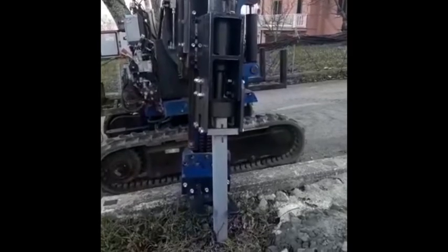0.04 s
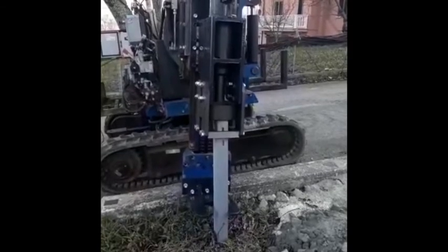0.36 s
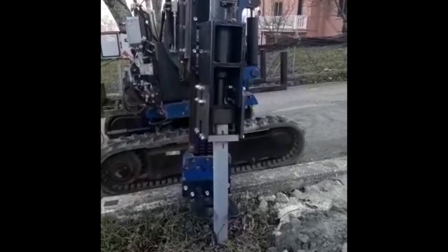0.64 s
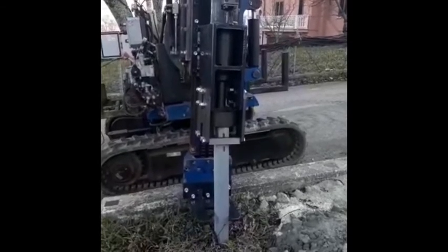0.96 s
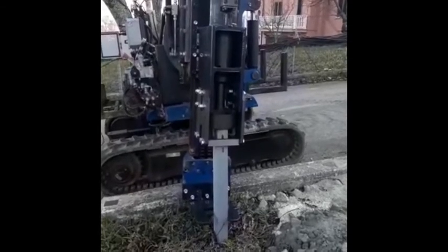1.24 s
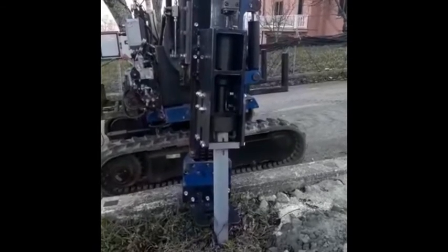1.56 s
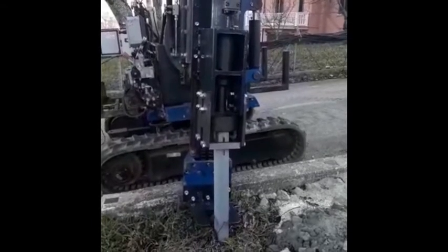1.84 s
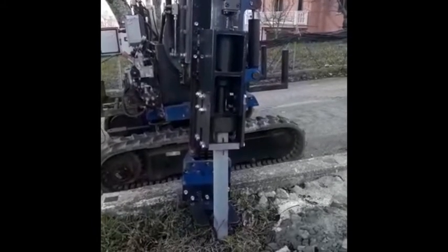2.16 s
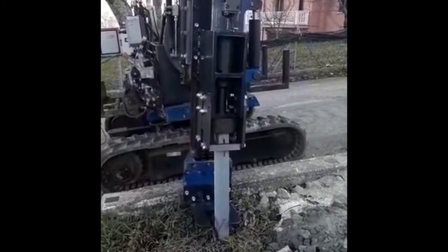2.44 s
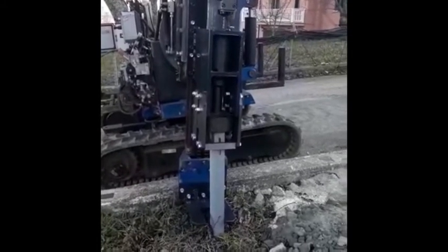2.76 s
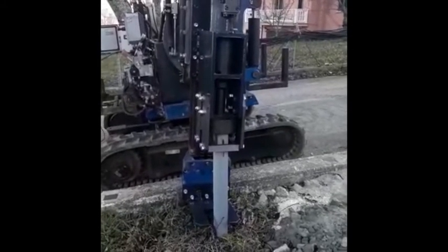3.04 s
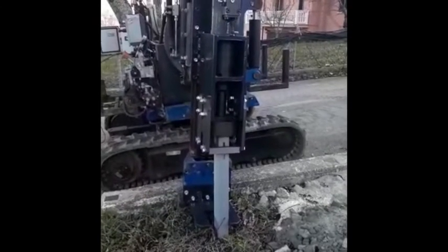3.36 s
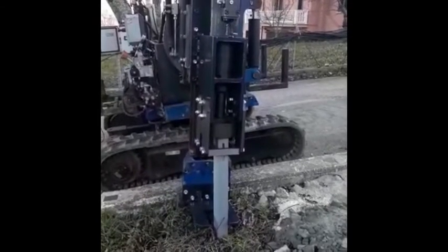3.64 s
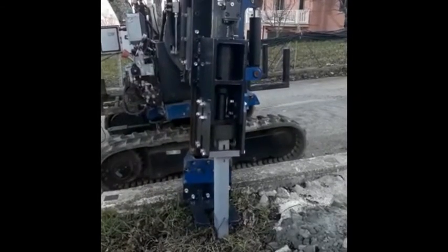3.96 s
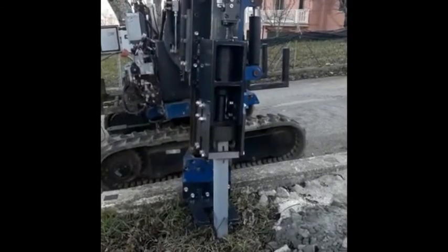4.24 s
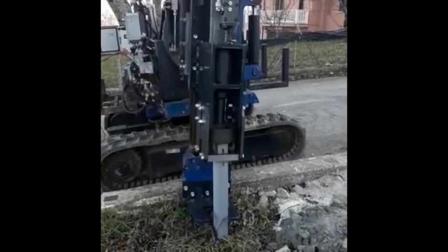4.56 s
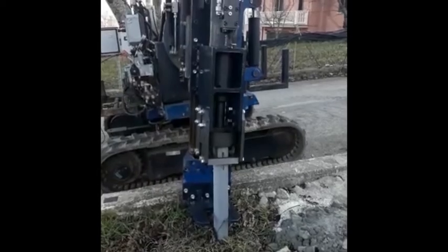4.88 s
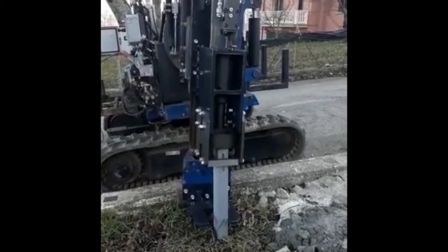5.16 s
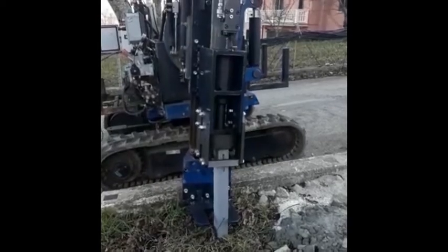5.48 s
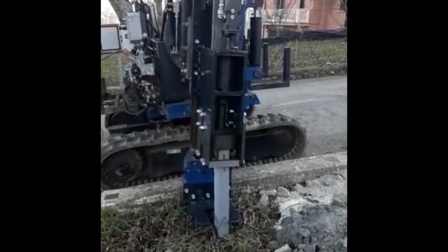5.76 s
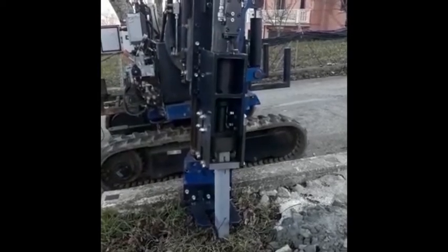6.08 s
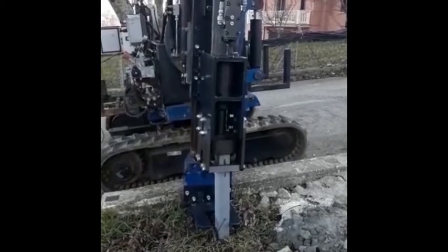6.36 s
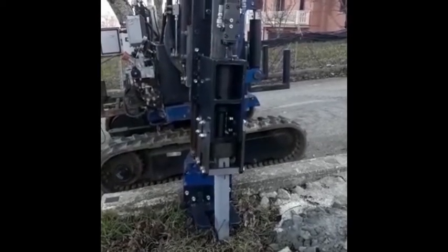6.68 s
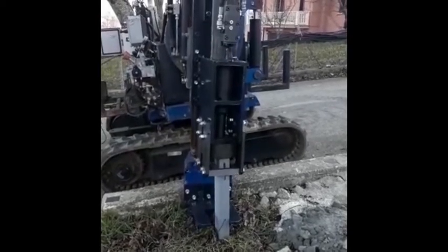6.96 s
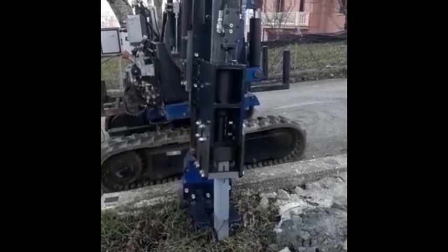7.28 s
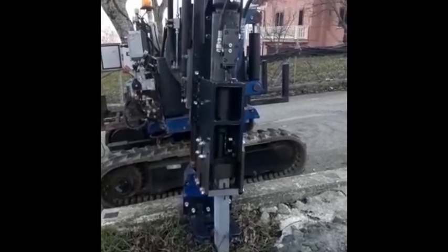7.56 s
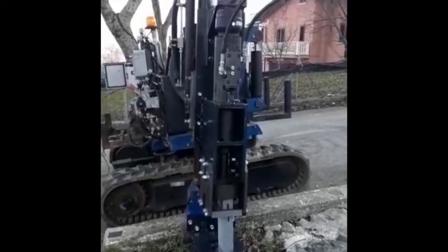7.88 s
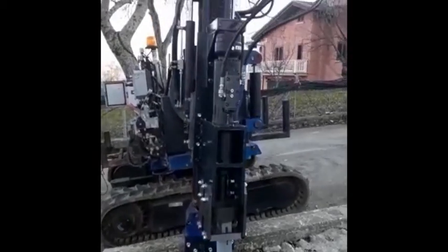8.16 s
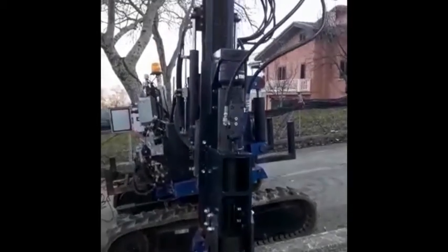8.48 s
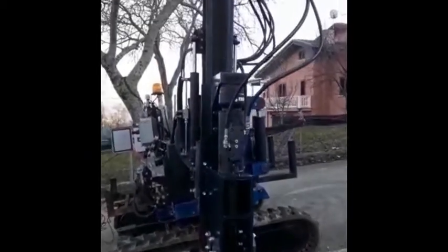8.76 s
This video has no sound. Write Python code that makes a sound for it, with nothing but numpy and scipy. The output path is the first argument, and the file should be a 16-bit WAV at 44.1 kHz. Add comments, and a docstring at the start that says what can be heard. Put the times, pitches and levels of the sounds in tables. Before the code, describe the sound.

Rapid, evenly spaced steel blows sound close by throughout as a tracked rig hammers a post into a road verge. Each hit crashes and leaves a thin, bright ring with a short outdoor wash. The post sings out more in two stretches, and the cap sometimes drops back with a second clank. A quieter diesel drone and faint oil whistle run beneath, the engine slowing at the end.

```python
"""A roadside verge: a hydraulic hammer on a tracked rig drives a steel post, about six blows a second.
Each blow is a valve tick, a dense steel crash that holds its level briefly and dies away, and a high
ring that lasts until the cap seats again. Twice the cap works loose and the post sings; now and then
the cap drops back with a second clank. Underneath, oil whistles faintly and the diesel drones, sagging
towards the end."""
import sys
import numpy as np
from scipy import signal
from scipy.io import wavfile

SR = 44100
rng = np.random.default_rng(int(sys.argv[2]) if len(sys.argv) > 2 else 0)


def wav_record(signal):
    """Record a signal, one row per channel, as 16-bit PCM in the file named by sys.argv[1]."""
    frames = np.transpose(np.atleast_2d(signal))
    bounded = np.clip(frames, -1, 1)
    # unit amplitude maps onto the largest positive 16-bit level
    quanta = np.round(bounded * 32767).astype(np.int16)
    wavfile.write(sys.argv[1], SR, quanta)


N = 393372
TIME = np.arange(N) / SR
SIDES = np.array([[.5], [-.5]])  # splits a left-right difference between the channels

# how alike the two channels are: (frequency [Hz], correlation [0-1])
STEREO_LIKENESS = [(30, .42), (60, .3), (130, .14), (290, .24), (640, .3), (1410, .04), (3100, .02),
                   (7000, 0)]
# the diesel's speed and load: (time [s], firing rate [Hz], exhaust boom level [dB])
ENGINE_RUN = [(0, 65.9, -39.5), (.6, 65.7, -50), (3.4, 66, -48), (4.7, 65.5, -42.5), (5.2, 65.75, -49.5),
              (6.3, 65.66, -48.5), (7.4, 64.8, -41.5), (8.1, 64.6, -43.5), (8.45, 60.6, -41),
              (8.649, 61.5, -49), (8.8, 51.2, -47), (8.92, 51, -48)]
# the diesel's other harmonics: (multiple of the firing rate, level [dB])
ENGINE_HARMONICS = [(1, -49), (3, -51.5), (4, -55.5), (5, -53.5), (6, -52.5)]
# colour of the engine and pump noise: (frequency [Hz], relative density [dB])
DRONE_SPECTRUM = [(25, -9), (60, -14), (90, -1), (130, -12), (250, -7), (600, -2), (1500, 0), (3000, -4.5),
                  (4500, -28), (6500, -12), (10000, -14), (15000, -19)]
# colour of the valve tick: (frequency [Hz], relative density [dB])
TICK_SPECTRUM = [(100, 1), (500, 11), (1800, 9.5), (4000, 4.5), (7000, 2), (10500, 8.5), (15000, -14)]
# the ram lands: (time [s], relative crash level [dB])
BLOWS = [(0.0131, -13), (0.186, -13), (0.3594, -12.5), (0.5289, -12.5), (0.699, -12), (0.869, -14.5),
         (1.0381, -14), (1.2048, -13), (1.3739, -13), (1.5413, -12.5), (1.7078, -12.5), (1.874, -13),
         (2.0381, -12), (2.2037, -12.5), (2.372, -13), (2.541, -13), (2.7107, -12.5), (2.8832, -14),
         (3.0571, -14), (3.23, -14.5), (3.403, -15), (3.5822, -16), (3.7556, -12.5), (3.9204, -12.5),
         (4.0883, -13.5), (4.2563, -13), (4.4261, -13.5), (4.5975, -11.5), (4.7675, -12), (4.9368, -13),
         (5.104, -12), (5.2721, -12.5), (5.4389, -14), (5.599, -12.5), (5.765, -13.4), (5.9276, -15),
         (6.092, -15), (6.2572, -15), (6.4276, -14), (6.6034, -13.5), (6.771, -13.5), (6.9373, -11.5),
         (7.1063, -12), (7.277, -13), (7.4477, -13), (7.6203, -11.5), (7.7938, -12.5), (7.9674, -12),
         (8.1411, -12), (8.3172, -11.5), (8.4989, -11.5), (8.6938, -12), (8.918, -10)]
# how the cap sits on the post: (time [s], looseness [0 tight to 1 bouncing clear])
CAP_LOOSENESS = [(0, 0.093), (1.7, 0.049), (2.2, 0.34), (2.37, 0.39), (2.71, 0.52), (2.88, 0.68),
                 (3.06, 0.91), (3.4, 0.93), (3.58, 0.61), (3.76, 0.34), (4.6, .2), (5.44, 0.19),
                 (5.93, 0.51), (6.09, 0.54), (6.26, 0.79), (6.43, 0.64), (6.6, 0.3), (8.7, 0.16)]
# how long the crash holds, and how a looser cap frees the post to ring longer and louder:
# (looseness [0-1], crash hold [s], free ring [s], low ring [dB], middle ring [dB], high ring [dB])
SEATING = [(0, 0.014, 0.015, -42, -42, -22), (0.243, 0.021, 0.014, -23, -29, -20.5),
           (0.515, 0.028, 0.069, -23.5, -27, -16.5), (.75, 0.073, 0.082, -14, -20.5, -19.5),
           (0.994, 0.028, 0.193, -22, -16, -19)]
# pitches of the cap's high modes: (frequency [Hz])
CAP_HZ = [7660, 7790, 9572, 10237, 10485, 11516, 11649, 13210, 13992, 14166, 14925, 15725]
# how each of them rings: (level against the crash [dB], t60 before the cap seats [s])
CAP_MODES = [(-9.5, 0.1), (-12, 0.13), (-17, 0.086), (-13, 0.45), (-27, 0.1), (-17, 0.26), (-27, 0.27),
             (-17, 0.12), (-15.5, 0.32), (-14.5, 0.28), (-27, .17), (-21, 0.49)]
# spells when one cap mode sings on: (start [s], end [s], near frequency [Hz], level [dB], t60 [s])
ZING_SPELLS = [(0, .95, 14166, -22.5, 0.63), (3.85, 4.35, 11570, -24.5, 1.4), (4.5, 5.7, 11470, -31.5, 0.6),
               (4.85, 5.02, 14300, -16.5, 0.28), (6.01, 6.18, 10500, -7, 0.31),
               (6.85, 7.03, 11516, -24, 0.76), (7.37, 8.06, 14100, -17, 0.18),
               (8.4, 8.8, 11400, -34.5, 0.48)]
# the cap drops back on the post: (time [s], relative level [dB])
CAP_DROPS = [(2.955, -30), (3.496, -22), (4.484, -13.5), (6.825, -20), (7.163, -15), (7.33, -24.5),
             (7.498, -24), (7.671, -14), (7.717, -19.5)]
# resonances of the dropping cap: (frequency [Hz], width [Hz], gain [dB])
CLANK_MODES = [(1086, 37, -15), (1558, 18, -15), (1635, 40, -6), (2116, 78, -2), (2410, 30, -8.5),
               (2670, 30, -6), (3100, 34, -12), (3240, 75, -16)]
# pitches of the post's modes: (frequency [Hz])
POST_HZ = [4488, 5930, 6717, 7731, 9558, 10237, 11229, 13210, 13992, 14925, 15455]
# how each of them rings: (gain [dB], free t60 [s], left over right [dB], left phase lead [rad])
POST_MODES = [(-5, 0.58, -0.5, -2), (-11, 0.24, 6, 1.5), (-6.5, 2.7, 0.5, 1.03), (-5, 1.2, -1, 2),
              (-3.5, 1.05, 11, -1.9), (-14, 0.66, 11, 0), (-10, 1.7, -1, 1.8), (-12.5, 1.2, 6, -1.5),
              (-16, 1.5, 0, -1), (-10.5, 1, -10, 3.5), (-29, 0.37, 0, 17)]
# resonances of the hammer housing and cap: (frequency [Hz], width [Hz], gain [dB])
HOUSING_MODES = [(256, 15.5, -24.5), (363, 16.5, -18.5), (565, 39, -17.5), (640.3, 12.4, -16),
                 (788, 30, -17.5), (957, 98, -23), (1075, 23, -21), (1203, 26, -15.5), (1296, 11.5, -23),
                 (1466, 90, -20.5), (1541, 37, -15.5), (1649, 71, -15.5), (1804, 26, -17.5),
                 (2010, 21, -24.5), (2187, 105, -17), (2570, 9.7, -33), (3197, 56, -18.5), (4475, 420, -14),
                 (9650, 150, -10), (10470, 170, -32)]
# colour of the crash's dense steel modes: (frequency [Hz], relative density [dB])
CRASH_SPECTRUM = [(40, -21), (80, -4), (160, 2), (320, 1.5), (800, -0.5), (1600, 2), (2600, -2),
                  (4300, -3.5), (6000, -15), (8400, -5.5), (9900, -9), (12300, -20), (15500, -10)]
# how fast the crash dies: (frequency [Hz], t60 [s])
CRASH_T60 = [(80, 0.078), (250, 0.15), (800, 0.23), (2000, 0.2), (6000, 0.045), (10000, 0.21),
             (15000, 0.059)]
# wash thrown back by rig, road and houses: (frequency [Hz], level against the crash [dB])
WASH_LEVELS = [(100, -62), (600, -3.5), (1500, -7.5), (4000, -13.5), (7000, -19.5), (15000, -34)]


def from_db(db):
    """Decibels to gain."""
    return 10 ** (np.asarray(db) / 20)


def unit_rms(x):
    """Scale to an rms of 1."""
    return x / np.sqrt(np.mean(x ** 2) + 1e-20)


def at_hz(points, hz):
    """Read a table on a log-frequency axis."""
    frequencies, values = np.transpose(points)
    return np.interp(np.log(hz), np.log(frequencies), values)


def attack(age, rise_s):
    """An onset that eases from 0 up to 1."""
    return 1 - np.exp(-age / rise_s)


def fade(age, t60):
    """Hold at 1 until age zero, then decay exponentially."""
    return np.exp(-np.log(1000) * np.maximum(age, 0) / max(t60, .005))


def since(times):
    """For every sample: the latest event's index and its age in seconds (10 before the first)."""
    latest = np.searchsorted(times, TIME, side="right") - 1
    return np.maximum(latest, 0), np.where(latest < 0, 10, TIME - times[latest])


def drift(rate):
    """A smooth random modulator with rms 1 that moves about `rate` times a second."""
    hop, warm_up = 40, 2000
    pole = np.exp(-2 * np.pi * rate * hop / SR)
    white = rng.standard_normal(N // hop + warm_up + 2)
    slow = signal.lfilter([1], [1, -2 * pole, pole * pole], white)[warm_up:]
    return np.interp(np.arange(N) / hop, np.arange(len(slow)), unit_rms(slow))


def widen(pair, hz):
    """Two unrelated signals become mid and side of a stereo image, narrower in the bass."""
    alike = at_hz(STEREO_LIKENESS, hz)
    mid, side = np.sqrt((1 + alike) / 2) * pair[0], np.sqrt((1 - alike) / 2) * pair[1]
    return np.array([mid + side, mid - side])


def bands(white, spectrum):
    """Half-octave stereo bands (centre, signal) that add up to the given colour with rms about 1."""
    edges = np.geomspace(24, 17000, 20)
    centres = np.sqrt(edges[1:] * edges[:-1])
    gains = from_db(at_hz(spectrum, centres)) * np.sqrt(np.diff(edges))
    for k, hz in enumerate(centres):
        bandpass = signal.butter(2, edges[k:k + 2], "band", fs=SR, output="sos")
        band = signal.sosfilt(bandpass, white[k % 2])  # neighbouring bands get unrelated noise
        yield hz, gains[k] / np.linalg.norm(gains) * unit_rms(widen(band, hz))


def coloured(spectrum):
    """A steady bed of stereo noise in the given colour."""
    return sum(band for _, band in bands(rng.standard_normal((2, 2, N)), spectrum))


def resonate(x, hz, width):
    """A resonance that keeps the rms of white noise."""
    pole = np.exp(-np.pi * width / SR)
    gain = np.sqrt((1 - pole * pole) / 2)
    return signal.lfilter([gain, 0, -gain], [1, -2 * pole * np.cos(2 * np.pi * hz / SR), pole * pole], x)


def oil_whistle(level_db=-51, hz=4540, width_hz=220):
    """Oil whistles faintly through a valve all the time."""
    return from_db(level_db) * resonate(rng.standard_normal((2, N)), hz, width_hz)


def diesel(throb=0.4, waver=0.0038, flutter_db=3.0, drone_db=-39.0, follows_load=0.62, db_per_octave=22):
    """Firing harmonics, an exhaust boom on the second, and pump noise that throbs with the firing."""
    times, *columns = np.transpose(ENGINE_RUN)
    firing_hz, boom_db = [np.interp(TIME, times, column) for column in columns]
    phase = 2 * np.pi * np.cumsum(firing_hz * (1 + waver * drift(5.4))) / SR
    hum = 0
    for multiple, db in list(ENGINE_HARMONICS) + [(2, boom_db)]:
        gain = np.sqrt(2) * from_db(db + flutter_db * drift(6.0))
        hum += gain * np.sin(multiple * phase + 2 * np.pi * rng.random())
    # the noise swells with load and speed
    load_db = follows_load * (boom_db - boom_db.mean())
    speed_db = db_per_octave * np.log2(firing_hz / firing_hz.mean())
    drone = from_db(drone_db + load_db + speed_db) * coloured(DRONE_SPECTRUM)
    return hum + (1 + throb * np.cos(phase)) * drone


def valve_ticks(lead_s=0.0082, hold_s=0.0047, t60=0.028, level_db=-24.5, scatter_db=2.0,
                ceiling_db=-25, scrape_s=0.0083, scrape_db=-3.0):
    """The valve ticks just before the ram lands; on its louder strokes a scrape swells into the blow."""
    start = np.transpose(BLOWS)[0]
    blow, age = since(start - lead_s)
    strength = from_db(level_db + scatter_db * rng.standard_normal(len(start)))[blow]
    tick = np.minimum(strength, from_db(ceiling_db))
    scrape = from_db(scrape_db) * (strength - tick) * np.exp(-abs(age - lead_s) / scrape_s)
    return (tick * fade(age - hold_s, t60) + scrape) * coloured(TICK_SPECTRUM)


def strokes():
    """For each blow: time, crash level, looseness, then the SEATING values for that looseness."""
    start, crash_db = np.transpose(BLOWS)
    loose = np.interp(start, *np.transpose(CAP_LOOSENESS))
    steps, *columns = np.transpose(SEATING)
    return [start, crash_db, loose] + [np.interp(loose, steps, column) for column in columns]


def cap_zings(rise_s=0.0084, spread_rad=1.0, scatter_db=2.5):
    """In short spells, a single mode of the cap rings on thinly into the gap after each blow."""
    start = np.transpose(BLOWS)[0]
    out = np.zeros((2, N))
    for begin, end, near_hz, db, t60 in ZING_SPELLS:
        hz = min(CAP_HZ, key=lambda mode_hz: abs(mode_hz - near_hz))
        for blow_s in start[(start >= begin) & (start <= end)]:
            at = int(blow_s * SR)
            age = TIME[:min(SR, N - at)]
            phase = 2 * np.pi * (hz * age + rng.random()) + spread_rad * rng.standard_normal((2, 1))
            gain = from_db(db + scatter_db * rng.standard_normal())
            out[:, at:at + len(age)] += gain * attack(age, rise_s) * fade(age, t60) * np.sin(phase)
    return out


def drop_envelope(trim_db, rise_s, t60):
    """A sharp swell and decay each time the cap drops back on the post."""
    start, db = np.transpose(CAP_DROPS)
    drop, age = since(start)
    return from_db(db[drop] + trim_db) * attack(age, rise_s) * fade(age, t60)


def cap_clanks():
    """The falling cap rattles briefly and rings in its own midrange modes."""
    rattle = drop_envelope(trim_db=0.5, rise_s=0.0012, t60=0.14) * rng.standard_normal((2, N))
    return sum(from_db(db) * widen(resonate(rattle, hz, width), hz) for hz, width, db in CLANK_MODES)


def cap_ring(rise_s=0.00048, scatter_db=3.0, buzz_rad=1.95, flutter_db=4.0, settle_t60=0.73,
             seat_s=0.055, seated_t60=0.46):
    """The cap meets the ram a little differently each time, so every blow favours other modes."""
    start, crash_db, _, hold_s = strokes()[:4]
    blow, age = since(start)
    envelope = attack(age, rise_s) * fade(age - seat_s, seated_t60)  # seating damps the cap
    roughness = fade(age - hold_s[blow], settle_t60)
    out = 0
    for hz, (db, t60) in zip(CAP_HZ, CAP_MODES):
        chance = rng.standard_normal((len(start), 3))[blow].T  # level, left phase, right phase
        ring_db = crash_db[blow] + db + scatter_db * chance[0] + flutter_db * roughness * drift(90)
        phase = 2 * np.pi * (hz * TIME + chance[1:]) + buzz_rad * roughness * drift(80)
        out += from_db(ring_db) * envelope * fade(age - hold_s[blow], t60) * np.sin(phase)
    return out


def post_ring(trim_db=4.0, seated_t60=0.14, lingers_below_hz=4700, rise_s=0.0047, scatter_db=1.0,
              flutter_db=3.5, buzz_rad=0.82, settle_t60=0.51, spread_rad=0.55):
    """The post rings freely while the cap is off it and is damped when the cap seats."""
    start, _, _, hold_s, free_s, *register_db = strokes()
    blow, age = since(start)
    roughness = fade(age - hold_s[blow], settle_t60)  # rough while the crash holds, then purer
    out = 0
    for hz, (db, free_t60, pan_db, lead_rad) in zip(POST_HZ, POST_MODES):
        damped_t60 = seated_t60 * (1 + (lingers_below_hz / hz) ** 4)  # high modes choke soonest
        envelope = attack(age, rise_s) * fade(age, free_t60) * fade(age - free_s[blow], damped_t60)
        drive_db = register_db[np.searchsorted([5500, 9000], hz)][blow]  # low, middle or high ring
        chance = rng.standard_normal((len(start), 3))[blow].T  # level, phase, stereo spread
        ring_db = drive_db + db + trim_db + scatter_db * chance[0] + flutter_db * roughness * drift(52)
        phase = 2 * np.pi * (hz * TIME + chance[1]) + buzz_rad * roughness * drift(45)
        stereo_phase = (lead_rad + spread_rad * chance[2]) * SIDES
        pan = unit_rms(from_db(pan_db * SIDES))
        out += np.sqrt(2) * from_db(ring_db) * envelope * pan * np.sin(phase + stereo_phase)
    return out


def housing_ring(drive, blow, scatter_db=3.0):
    """The body of the crash: housing and cap resonate, and each blow favours other resonances."""
    burst = drive * rng.standard_normal((2, N))
    out = 0
    for hz, width, db in HOUSING_MODES:
        favour = from_db(db + scatter_db * rng.standard_normal(len(BLOWS)))[blow]
        out += widen(resonate(favour * burst, hz, width), hz)
    return out


def steel_crash(trim_db=1.4, repeat_share=0.3, rise_s=0.0014, rough_db=1.87, crack_db=9.5,
                crack_s=0.0077, treble_hold=0.36, wash_t60=0.41, wash_stretch=0.58, housing_t60=0.17):
    """A dense steel crash holds its level briefly, then dies away."""
    start, crash_db, loose, hold_s = strokes()[:4]
    blow, age = since(start)
    force = from_db(crash_db[blow] + trim_db) * attack(age, rise_s)
    flicker = from_db(rough_db * drift(49))
    drop = drop_envelope(trim_db=-5.0, rise_s=rise_s, t60=0.22)  # the falling cap wakes the same modes
    # the same steel is struck each time, so part of the vibration repeats from blow to blow
    repeated = rng.standard_normal((2, 2, SR))[..., (age * SR).astype(int) % SR]
    fresh = rng.standard_normal((2, 2, N))
    white = np.sqrt(repeat_share) * repeated + np.sqrt(1 - repeat_share) * fresh
    wash_tail = fade(age / (1 + wash_stretch * loose[blow] ** 2), wash_t60)  # longer with a loose cap
    # the treble peaks early and lets go sooner
    crack = from_db(crack_db * np.exp(-age / crack_s)) - 1
    steel = 0
    for hz, band in bands(white, CRASH_SPECTRUM):
        treble = hz / (hz + 3000)
        band_hold_s = hold_s[blow] * (1 + treble * (treble_hold - 1))
        hit = force * flicker * (1 + treble * crack) * fade(age - band_hold_s, at_hz(CRASH_T60, hz))
        wash = force * from_db(at_hz(WASH_LEVELS, hz)) * wash_tail
        clank = drop * flicker * (1 - 0.067 * treble)
        steel += band * np.sqrt(hit ** 2 + wash ** 2 + clank ** 2)
    housing_drive = flicker * (force * fade(age - hold_s[blow], housing_t60) + drop)
    return steel + housing_ring(housing_drive, blow)


def scene(start_pan_db=0.35, pan_db_per_s=-0.2):
    """Hammer and post in front of the running rig, drifting slightly from left to right."""
    pan = from_db((start_pan_db + pan_db_per_s * TIME) * SIDES)
    hammer = steel_crash() + cap_clanks() + valve_ticks() + post_ring() + cap_ring() + cap_zings()
    return pan * hammer + diesel() + oil_whistle()


def record(dry, ceiling=0.91, cutoff_hz=15900):
    """Soft saturation rounds the peaks and a steep low-pass trims the very top."""
    lowpass = signal.ellip(10, .2, 70, cutoff_hz, fs=SR, output="sos")
    return signal.sosfilt(lowpass, ceiling * np.tanh(dry / ceiling))


dry = scene()
out = record(dry)
wav_record(out)
```